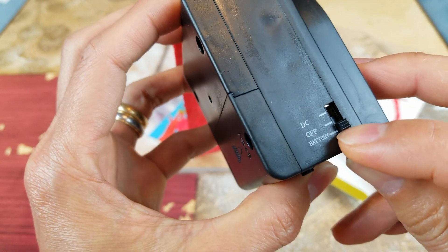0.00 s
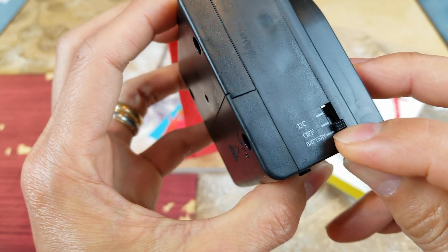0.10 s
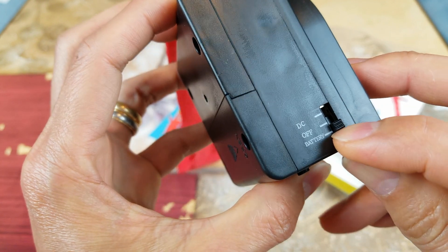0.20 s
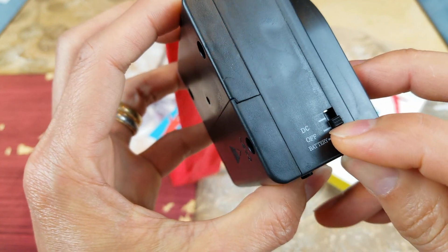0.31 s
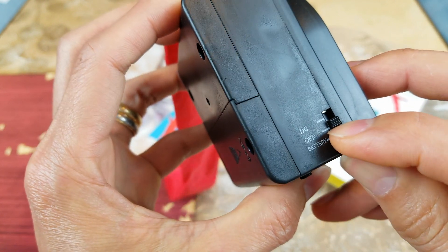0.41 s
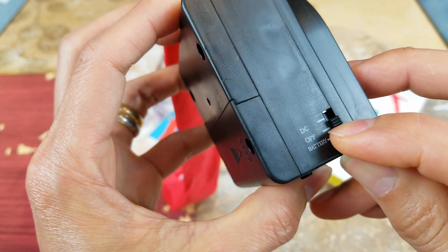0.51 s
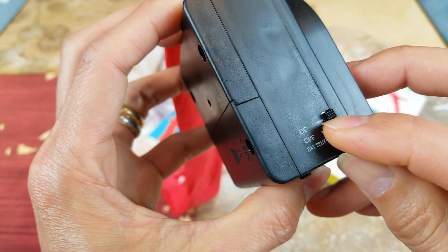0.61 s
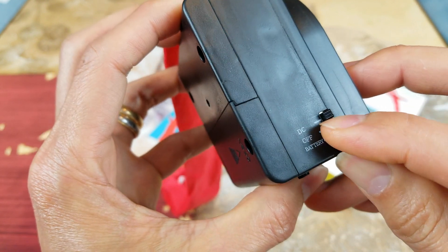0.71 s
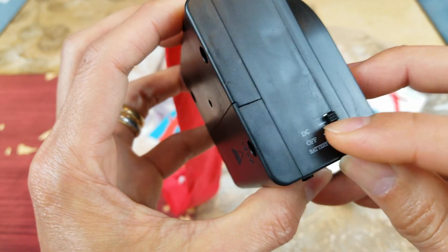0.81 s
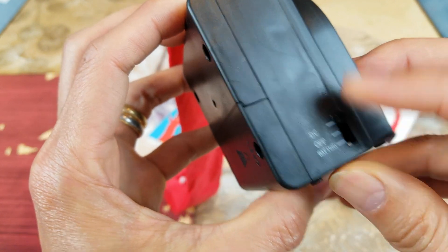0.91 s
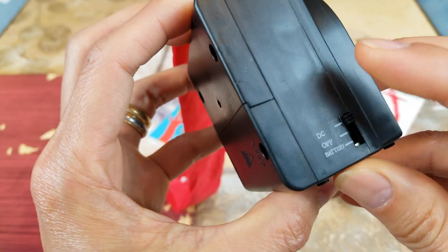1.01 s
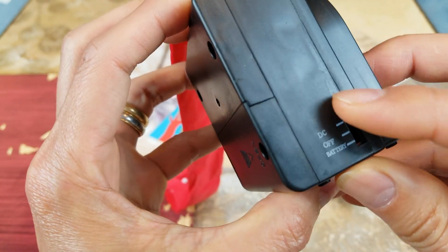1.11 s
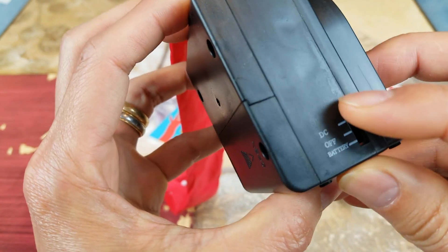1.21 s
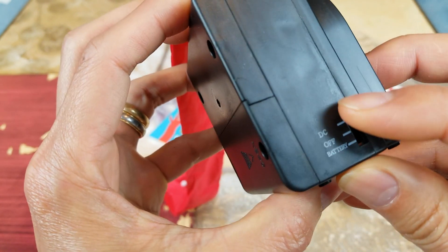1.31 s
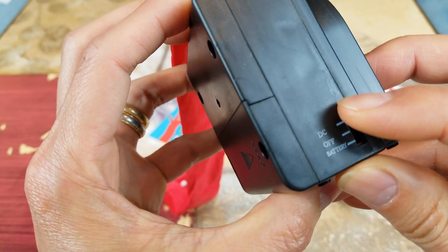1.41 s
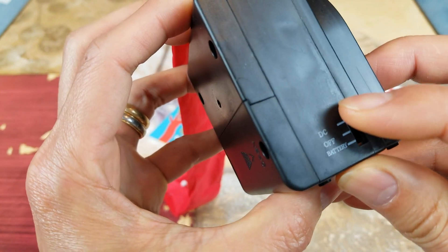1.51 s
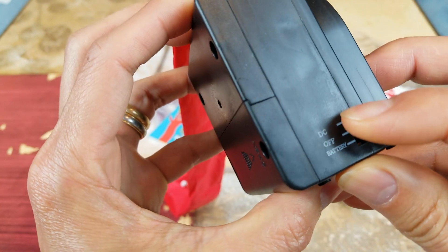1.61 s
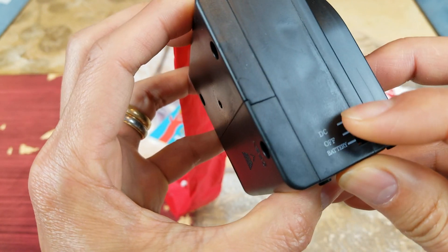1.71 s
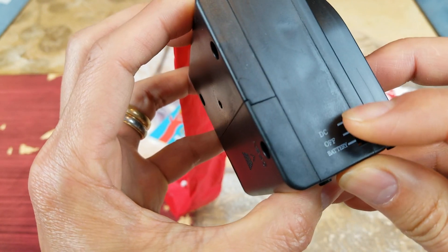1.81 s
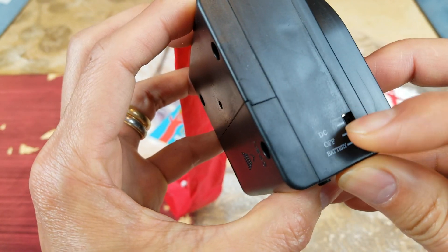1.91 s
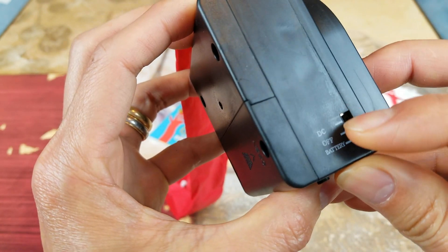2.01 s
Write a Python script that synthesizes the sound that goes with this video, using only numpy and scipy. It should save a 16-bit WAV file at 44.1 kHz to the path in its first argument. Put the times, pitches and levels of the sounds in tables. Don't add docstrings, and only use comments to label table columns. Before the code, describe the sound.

A small plastic slide switch snaps sharply four times on a hollow hand-held case, very close

```python
import sys
import numpy as np
from scipy import signal
from scipy.fft import rfft, irfft
from scipy.io import wavfile

SR = 44100
rng = np.random.default_rng(int(sys.argv[2]) if len(sys.argv) > 2 else 0)


def field_ratio(decibels):
    return 10 ** (np.asarray(decibels, dtype=float) / 20)


def to_wav(sig):
    pcm = np.clip(np.atleast_2d(sig), -1, 1) * 32767
    pcm = np.round(pcm).astype(np.int16)
    wavfile.write(sys.argv[1], SR, pcm.T)


N = 92610
EDGE_HZ = 16130


def evened(x):
    return x / np.sqrt(np.mean(x ** 2) + 1e-20)


def read(points, hz):
    f, value = np.transpose(points)
    return np.interp(np.log(hz + 1), np.log(f + 1), value)


def add(mix, s, sound):
    part = mix[:, round(s * SR):][:, :sound.shape[1]]
    part += sound[:, :part.shape[1]]


def coin_flips(*shape):
    return rng.choice([-1., 1.], shape)


def ring(x, modes):
    out = 0
    for k, (hz, width, db) in enumerate(modes):
        r = np.exp(-np.pi * width / SR)
        pole = r * np.exp(2j * np.pi * hz / SR)
        mode = 2 * signal.lfilter([1 - r], [1, -pole], x + 0j).real
        out = out + (-1) ** k * field_ratio(db) * mode
    return out


def band(x, lo_hz, hi_hz):
    sos = signal.butter(2, [lo_hz, hi_hz], "bandpass", fs=SR, output="sos")
    return signal.sosfilt(sos, x)


def sides(pan_db):
    return field_ratio(np.array([[pan_db / 2], [-pan_db / 2]]))


# (frequency [Hz], level [dB per Hz])
HUM = [(15, -56.5), (25, -2), (151, -3), (468, -13), (510, -13), (1500, -15.5), (1950, -26), (3300, -120)]
# (frequency [Hz], level [dB per Hz])
HISS = [(1500, -14), (3500, -19), (5500, -23), (7800, -29), (9500, -25), (12000, -17.5), (14500, -14.5),
        (16000, -11.5)]
# (frequency [Hz], left over right [dB])
HISS_PAN = [(60, 6), (240, 4), (950, 4), (3770, 2.5), (15000, 6)]
HISS_DB, HISS_EDGE_HZ = -63, 15970
PORT_HZ, PORT_WIDTH_HZ, PORT_DB = 15800, 860, 3


def hiss():
    hz = np.fft.rfftfreq(N, 1 / SR)
    port = PORT_DB * np.exp(-((hz - PORT_HZ) / PORT_WIDTH_HZ) ** 2)
    colour = read(HUM[:-1] + HISS, hz) + port
    balance = np.outer([.5, -.5], read(HISS_PAN, hz))
    spectrum = rfft(rng.standard_normal((2, N))) * field_ratio(colour + balance)
    heard = (hz > 20) * (hz < HISS_EDGE_HZ)
    return field_ratio(HISS_DB) * evened(irfft(spectrum * heard, N))


# (frequency [Hz], T60 [s])
ROOM = [(500, 0.158), (1300, 0.15), (3500, 0.26), (6000, 0.31), (9200, 0.26), (15000, 0.26)]
ROOM_DELAY_S, ROOM_RISE_S, ROOM_PAN_DB = 0.0038, 0.0068, 6


def tail(spread):
    t = np.arange(SR // 2) / SR
    arrival = np.clip((t - ROOM_DELAY_S) / ROOM_RISE_S, 0, 1)
    taps = rng.standard_normal((2, len(t))) * arrival
    hz, at, z = signal.stft(taps, SR, nperseg=128)
    decay_db = -60 * at / read(ROOM, hz)[:, None]
    z = z * field_ratio(read(spread, hz)[:, None] + decay_db) * (hz > 400)[:, None]
    out = signal.istft(z, SR, nperseg=128)[1]
    return sides(ROOM_PAN_DB) * out / np.linalg.norm(out, axis=1, keepdims=True)


# (frequency [Hz], level [dB])
FINGER_SPREAD = [(700, -16.5), (3000, -10.5), (6000, -2), (9000, -7.5), (16000, -11)]
FINGER_ROOM_DB = -6


def finger_echo(hand, effort):
    scattered = (effort * abs(hand).mean(0))[None]
    echo = signal.fftconvolve(scattered, tail(FINGER_SPREAD), axes=1)[:, :N]
    return field_ratio(FINGER_ROOM_DB) * echo


# (time [s], peak level [dB], pitch [Hz], length [s])
NUDGES = [
    (0.548, -66, 61, .07),
    (0.861, -64.5, 68, 0.07),
    (1.597, -68.5, 75, 0.11),
    (1.809, -56, 83.4, 0.063),
]


def nudge(s, peak_db, hz, length):
    u = np.arange(8000) / SR / length
    port_lag = np.array([[0], [.2]])
    phase = 2 * np.pi * (hz * length * u + port_lag)
    swell = 3 * u * np.exp(1 - 3 * u)
    return s, field_ratio(peak_db) * sides(12) * swell * np.sin(phase)


# (frequency [Hz], width [Hz], level [dB])
CASE = [(3000, 180, 3), (4260, 930, -3.5), (5950, 640, 4.5), (8570, 730, -4.5), (11390, 790, -10)]
FINGER_PAN_DB = 8


def finger(shape, bright_db):
    drive = coin_flips(2, len(shape)) * shape
    loudness = np.sqrt(np.mean(shape ** 2))
    case = evened(ring(drive, CASE))
    scratch = field_ratio(bright_db) * evened(band(drive, 9300, EDGE_HZ))
    body = field_ratio(-12.5) * evened(band(drive, 450, 2800))
    return loudness * sides(FINGER_PAN_DB) * (case + scratch + body)


# (time [s], length [s], level [dB], brightness [dB])
RUBS = [
    (.05, .14, -63.5, -10.5),
    (.2, 0.048, -68.5, 3.5),
    (.83, 0.1, -62.5, -5.5),
    (1.505, 0.055, -78, 12),
]


def rub(s, length, level_db, bright_db):
    t = np.arange(8000) / SR
    stroke = np.sin(np.pi * np.minimum(t / length, 1))
    return s, field_ratio(level_db) * finger(stroke, bright_db)


# (time [s], peak level [dB], rise [s], T60 [s], brightness [dB])
TICKS = [
    (.156, -57, 0.00037, 0.0066, -1),
    (.220, -64, .002, .03, 7),
    (.553, -47, 0.001, 0.05, -1),
    (.8565, -42, 0.00095, 0.015, -8),
    (.8965, -45, 0.00071, 0.019, -11),
    (1.0375, -63.5, 0.00054, 0.0096, 1),
    (1.511, -57.5, 0.00092, 0.0455, -12),
    (2.018, -58.5, 0.00063, .02, -2.5),
]


def tick(s, peak_db, rise_s, t60, bright_db):
    t = np.arange(-400, 1600) / SR
    press = np.exp(np.minimum(t, 0) / rise_s)
    shape = np.where(t < 0, press, field_ratio(-60 * t / t60))
    return s + t[0], field_ratio(peak_db) * finger(shape, bright_db)


# (time [s], peak level [dB], left over right [dB], slip level [dB], slip length [s])
SNAPS = [
    (0.246, -8, 15.5, -42, 0.00081),
    (0.5596, -11.5, 12, -31, 0.003),
    (1.5433, -8, 13, -44, 0.0026),
    (1.8004, -6, 7.5, -8, 0.0036),
]
# (rattle [s], knock level [dB], knock low [Hz], knock high [Hz], room level [dB])
LANDINGS = [
    (0.001, -24, 65, 1850, -36.5),
    (0.00132, -33.5, 80, 580, -42.5),
    (.0014, -34.5, 172, 1910, -37.5),
    (0.0014, -31, 310, 1850, -37.5),
]
# (frequency [Hz], width [Hz], level [dB])
GRIP_A = [(2484, 830, -12), (5090, 210, -21.5), (6200, 805, -31.5), (8270, 730, 5.5), (8590, 130, -24.5),
          (10560, 333, 6.5), (12250, 222, 0), (13100, 63, -17.5), (13090, 2020, 4), (14560, 285, -0.5)]
GRIP_B = [(2815, 1800, -14), (5760, 630, -6.5), (7684, 630, -10.5), (9060, 200, -9.5), (8960, 460, -6),
          (10370, 345, -1), (11600, 290, -8), (12700, 240, -4.5), (13500, 300, -21), (15090, 800, -3.5)]
GRIP_C = [(5250, 520, -5.5), (6720, 480, -1), (8110, 280, -4.5), (9170, 530, -4.5), (10200, 230, 1.5),
          (11180, 440, -3.5), (12080, 160, -0.5), (13140, 450, -3.5), (13800, 710, -3), (15800, 710, -4)]
GRIP_D = [(850, 210, -18), (1636, 200, -12.5), (2950, 300, -8), (3970, 490, -16.5), (5020, 260, -4),
          (6280, 760, -1.5), (8930, 140, -7), (11740, 230, -12), (12080, 580, -3), (13970, 250, -10),
          (14840, 600, -2.5)]
# (frequency [Hz], level [dB])
SPREAD_A = [(410, -63.5), (700, -38.5), (2270, -12), (2560, -10), (3890, -18), (9600, -11.5), (10700, 1),
            (16000, -7.5)]
SPREAD_B = [(410, -56), (700, -19), (2190, -15.5), (3030, -5.5), (3690, -14), (7690, -8.5), (10100, 0.5),
            (16000, -7.5)]
SPREAD_C = [(410, -61.5), (700, -26.5), (1040, -35), (1260, -42.5), (1580, -26), (3030, -17.5), (8420, -3),
            (16000, -4)]
SPREAD_D = [(410, -50), (700, -14.5), (1150, -21), (1300, -29), (1540, -4), (1770, -15.5), (5330, -4.5),
            (16000, -11)]
SLIP_SWELL_DB, RISE_S = 11.5, .00025
RATTLE_T60, SETTLE_DB, SETTLE_T60 = 0.003, -5.5, 0.019
CRACK_DB, CRACK_HZ, KNOCK_PAN_DB = -12.5, 3700, 3


def snap(s, peak_db, pan_db, slip_db, slip_s, rattle_s, knock_db, low_hz, high_hz, room_db, grip, spread):
    lead = 800
    t = np.arange(-lead, SR // 2) / SR
    early = np.minimum(t, 0)
    late = np.maximum(t - rattle_s, 0)

    slip = field_ratio(slip_db + SLIP_SWELL_DB * early / slip_s) * np.clip(4 + 4 * early / slip_s, 0, 1)
    before = np.exp(early / RISE_S) + slip
    after = field_ratio(-60 * late / RATTLE_T60) + field_ratio(SETTLE_DB - 60 * late / SETTLE_T60)
    drive = coin_flips(2, len(t)) * np.where(t < 0, before, after)

    crack = field_ratio(CRACK_DB) * evened(band(drive, CRACK_HZ, EDGE_HZ))
    case = evened(ring(drive, grip)) + crack
    case = case / abs(case).max(1, keepdims=True)

    knock = band(1. * (t == 0), low_hz, high_hz)
    knock = field_ratio(knock_db) * sides(KNOCK_PAN_DB) * knock / abs(knock).max()

    answer = np.pad(tail(spread), ((0, 0), (lead, 0)))[:, :len(t)]
    echo = field_ratio(room_db) * np.sqrt(SR / 20) * answer
    return s + t[0], field_ratio(peak_db) * sides(pan_db) * (case + knock) + echo


def scene():
    mix = hiss()
    hand = np.zeros((2, N))
    effort = coin_flips(N)

    grips = (GRIP_A, GRIP_B, GRIP_C, GRIP_D)
    spreads = (SPREAD_A, SPREAD_B, SPREAD_C, SPREAD_D)
    for detent, landing, grip, spread in zip(SNAPS, LANDINGS, grips, spreads):
        add(mix, *snap(*detent, *landing, grip, spread))

    for row in TICKS:
        add(hand, *tick(*row))
    for row in RUBS:
        add(hand, *rub(*row))
    for row in NUDGES:
        add(mix, *nudge(*row))
    return mix + hand + finger_echo(hand, effort)


def roll_off(x):
    return signal.sosfilt(signal.butter(12, 17180, fs=SR, output="sos"), x)


def record(dry):
    taps = signal.firwin(255, EDGE_HZ, window=("kaiser", 8), fs=SR)
    limited = signal.oaconvolve(dry, taps[None], "same")
    return roll_off(np.clip(limited, -1, 1))


dry = scene()
out = record(dry)
to_wav(out)
```